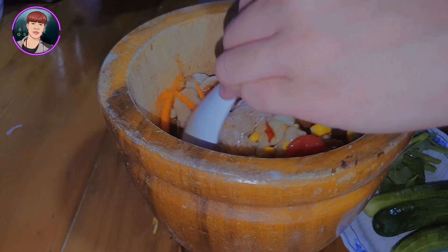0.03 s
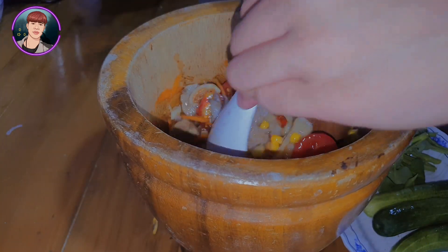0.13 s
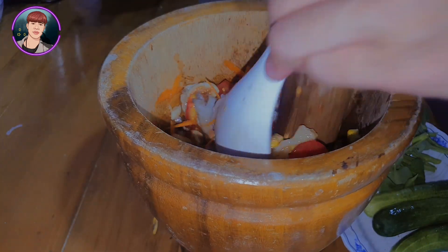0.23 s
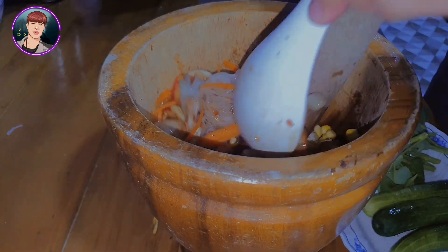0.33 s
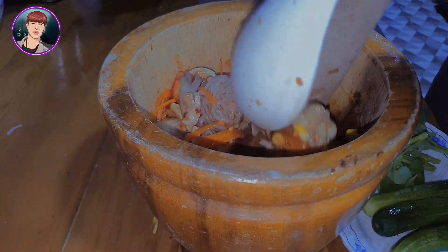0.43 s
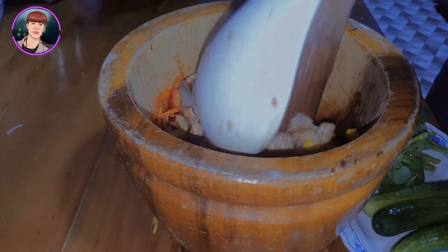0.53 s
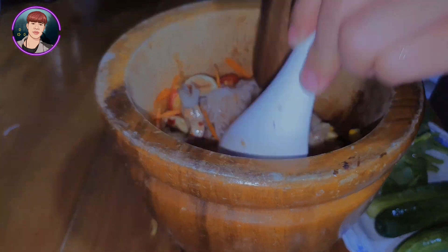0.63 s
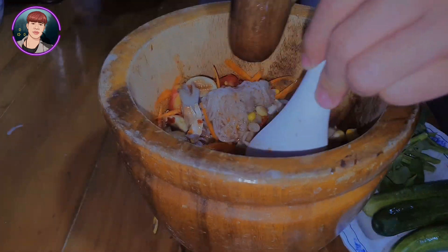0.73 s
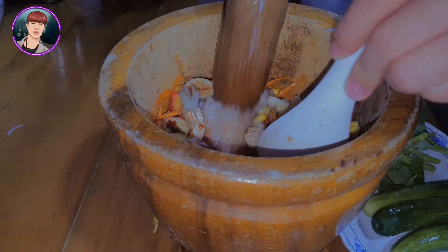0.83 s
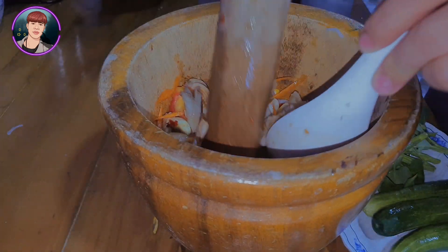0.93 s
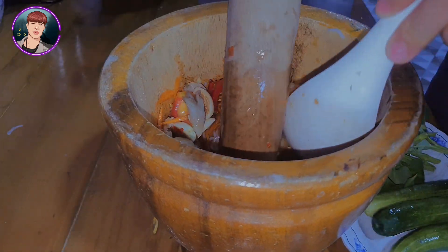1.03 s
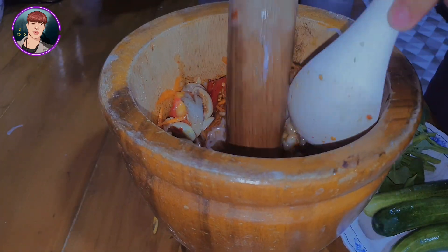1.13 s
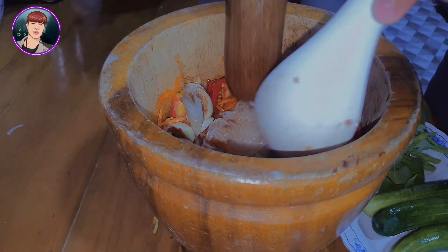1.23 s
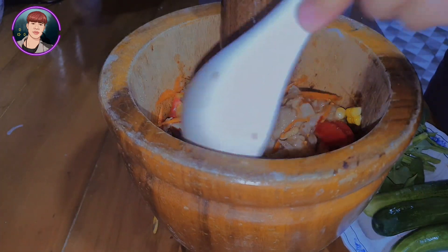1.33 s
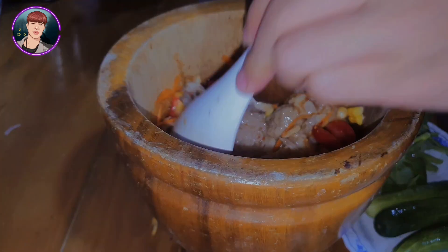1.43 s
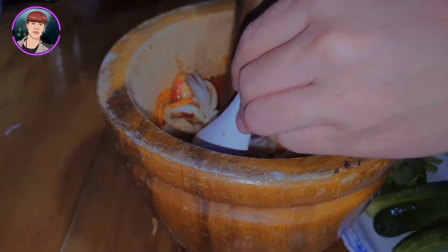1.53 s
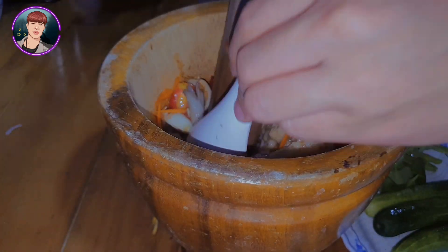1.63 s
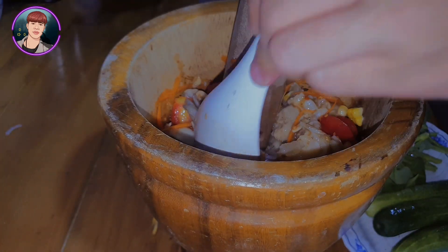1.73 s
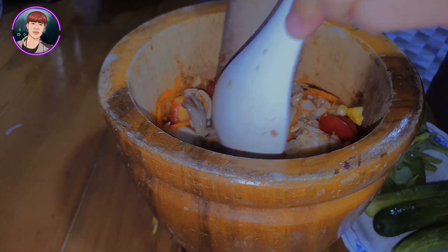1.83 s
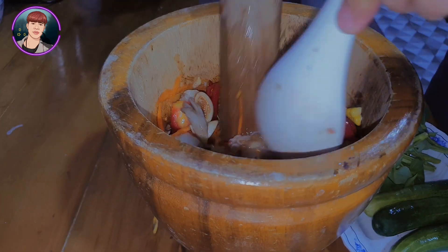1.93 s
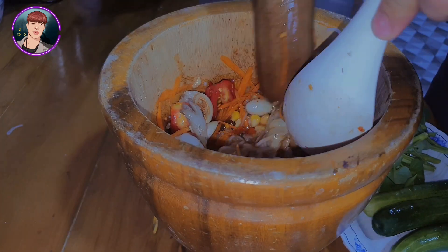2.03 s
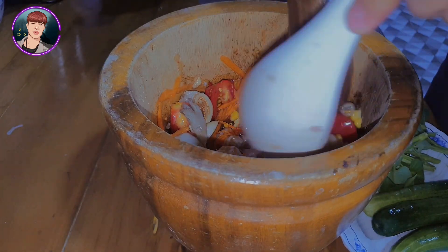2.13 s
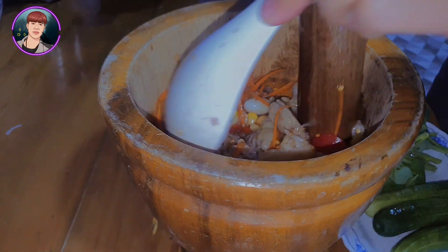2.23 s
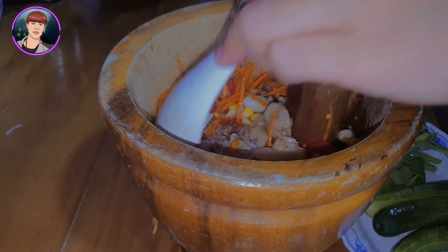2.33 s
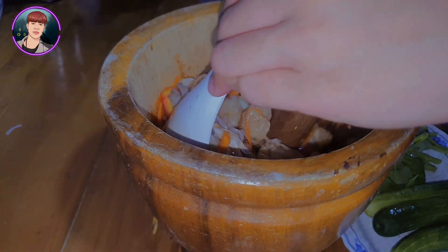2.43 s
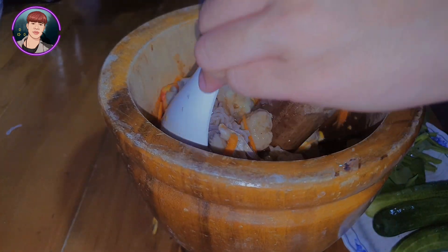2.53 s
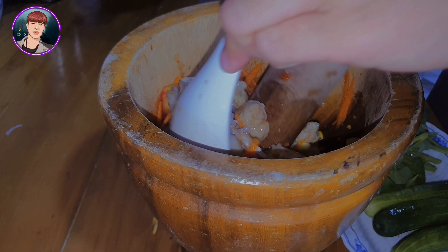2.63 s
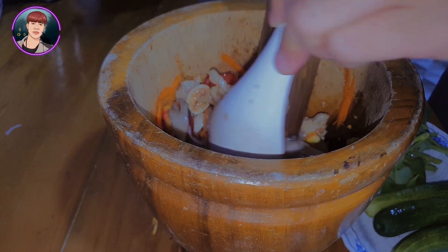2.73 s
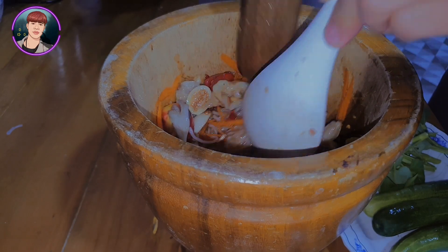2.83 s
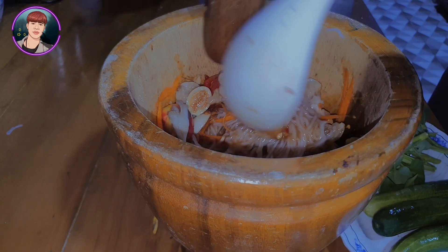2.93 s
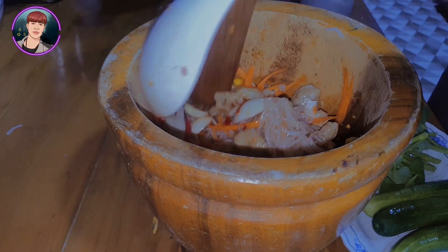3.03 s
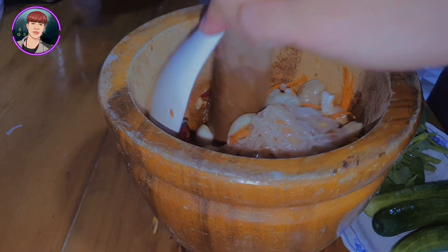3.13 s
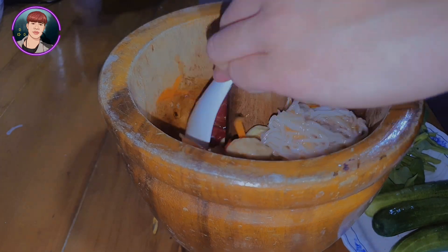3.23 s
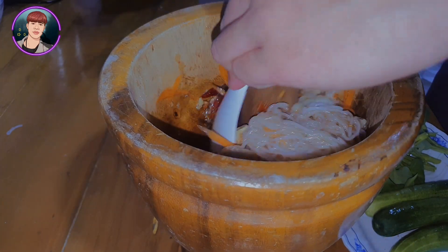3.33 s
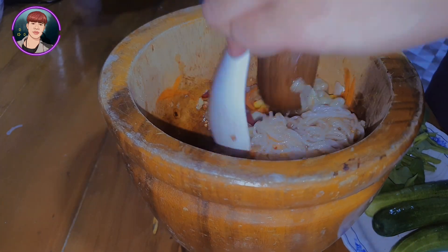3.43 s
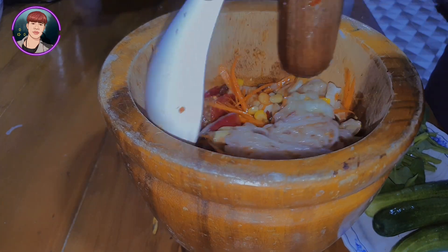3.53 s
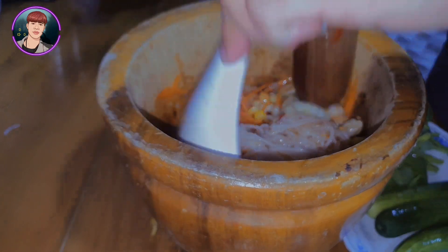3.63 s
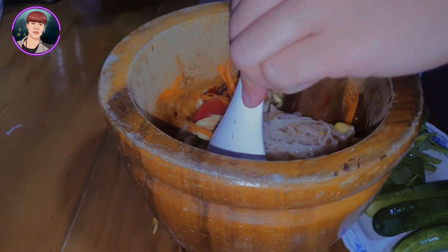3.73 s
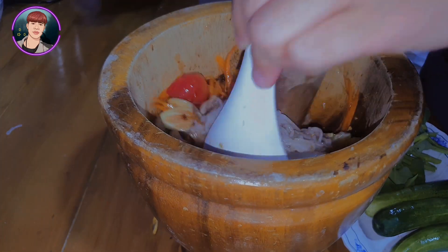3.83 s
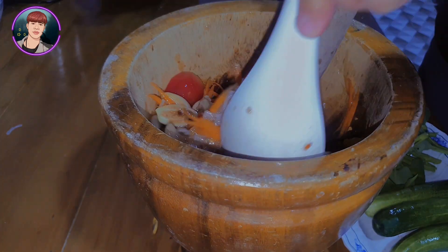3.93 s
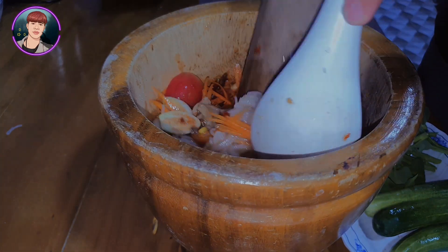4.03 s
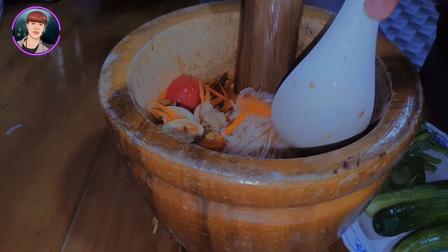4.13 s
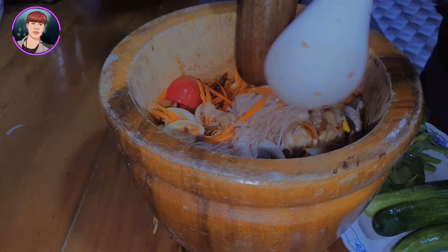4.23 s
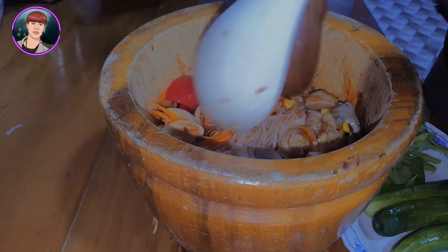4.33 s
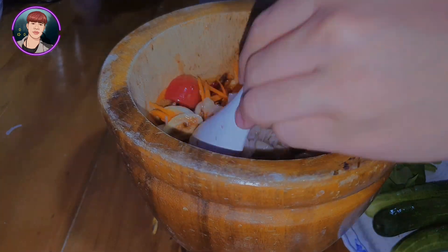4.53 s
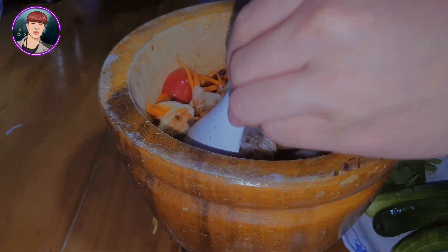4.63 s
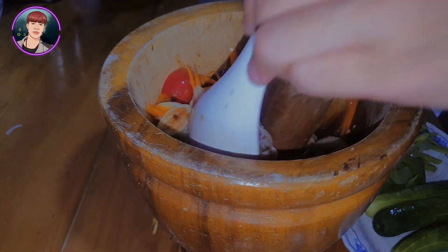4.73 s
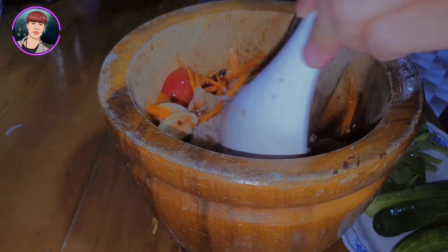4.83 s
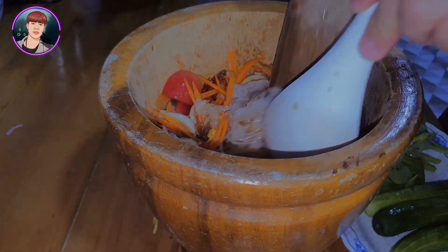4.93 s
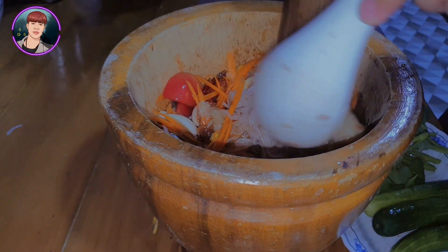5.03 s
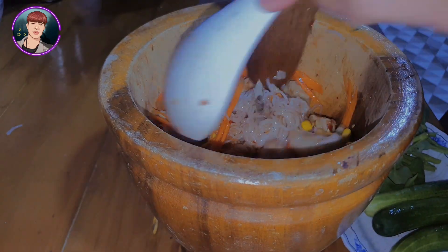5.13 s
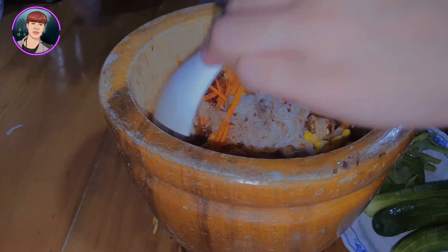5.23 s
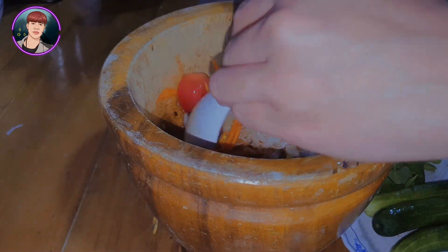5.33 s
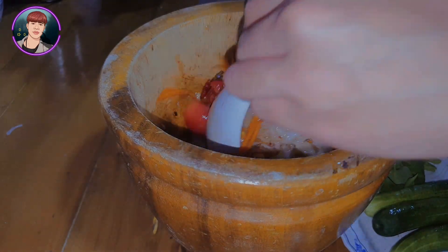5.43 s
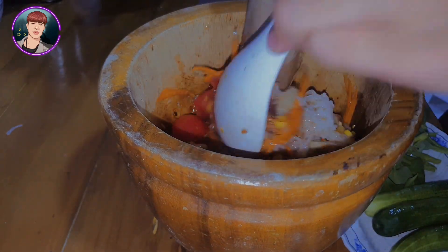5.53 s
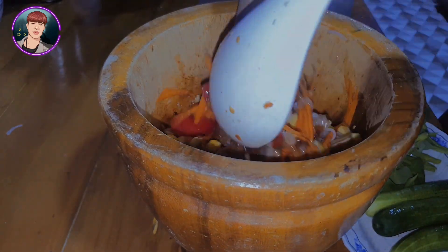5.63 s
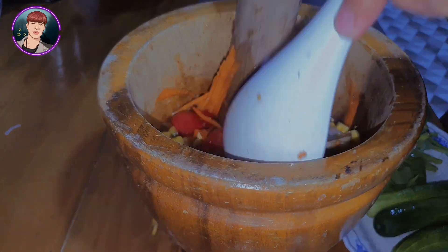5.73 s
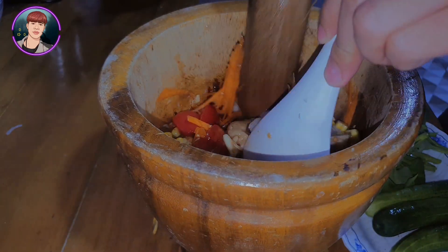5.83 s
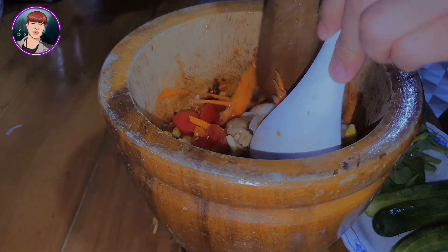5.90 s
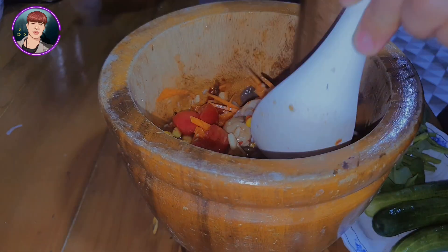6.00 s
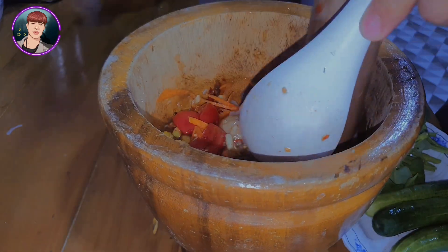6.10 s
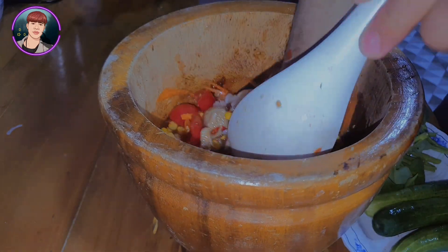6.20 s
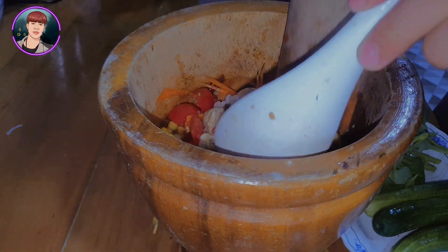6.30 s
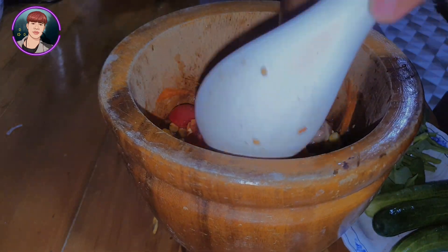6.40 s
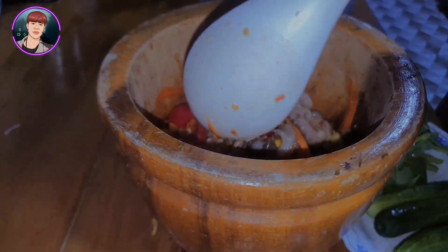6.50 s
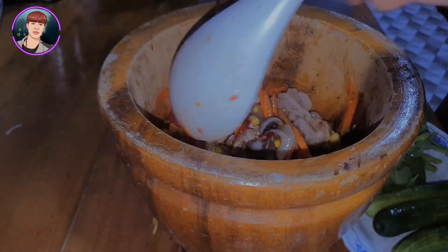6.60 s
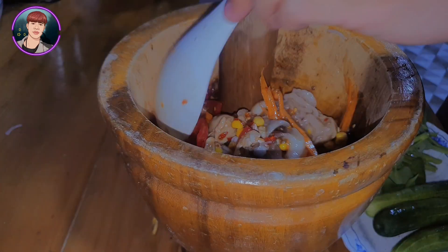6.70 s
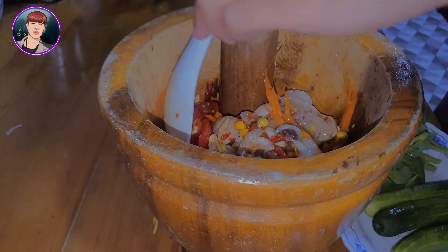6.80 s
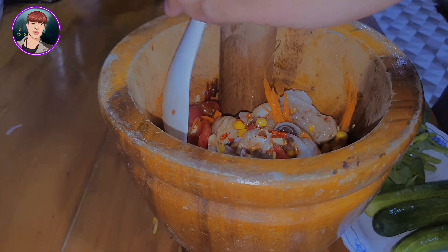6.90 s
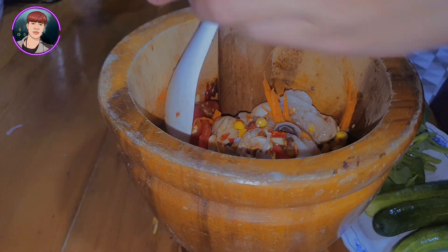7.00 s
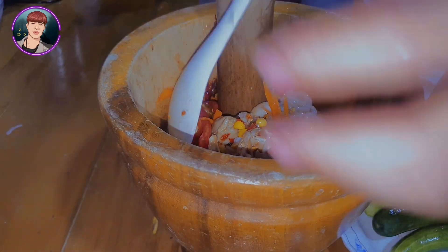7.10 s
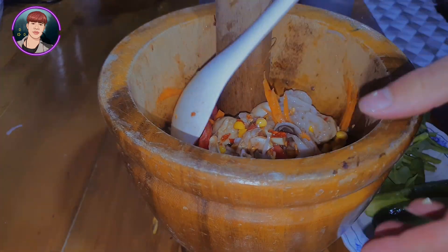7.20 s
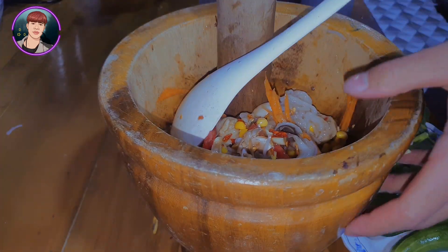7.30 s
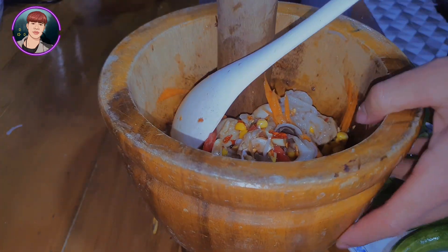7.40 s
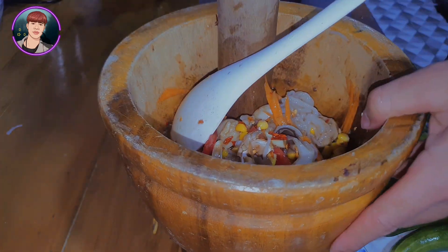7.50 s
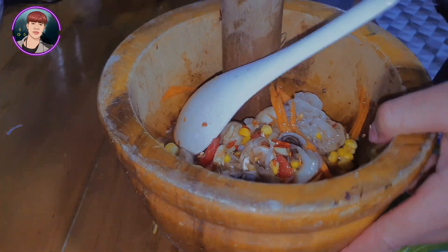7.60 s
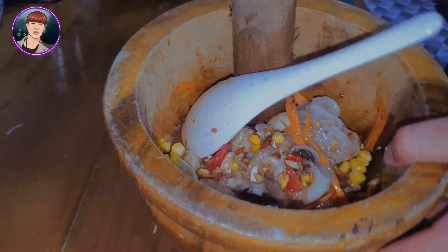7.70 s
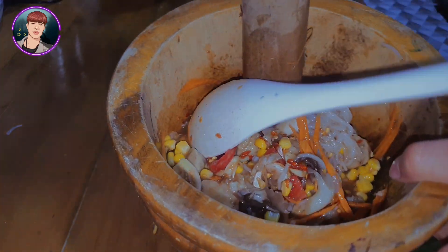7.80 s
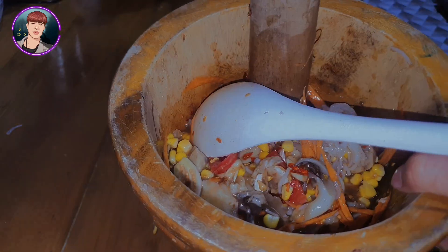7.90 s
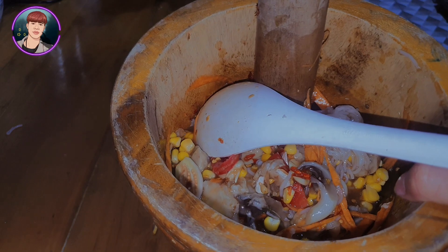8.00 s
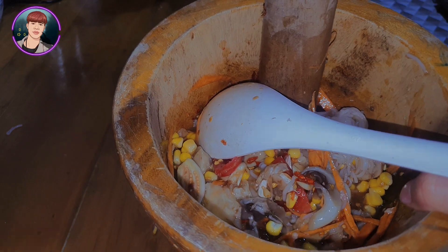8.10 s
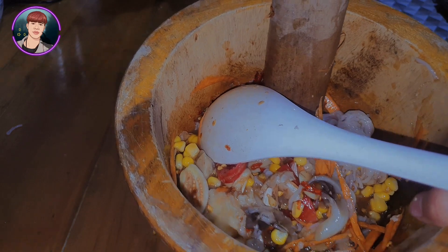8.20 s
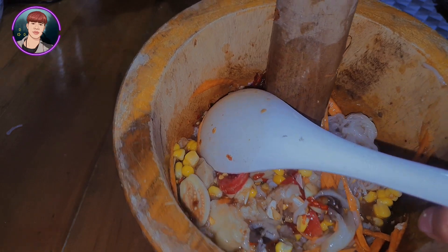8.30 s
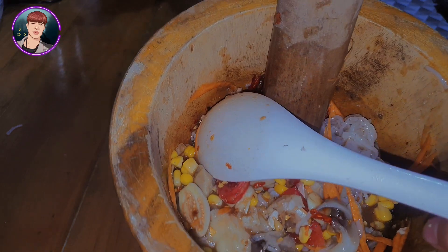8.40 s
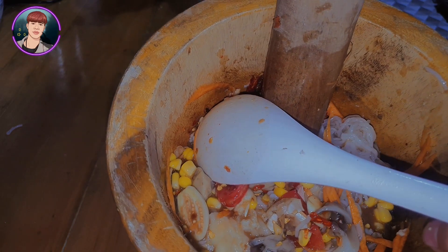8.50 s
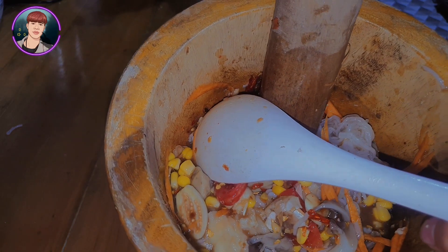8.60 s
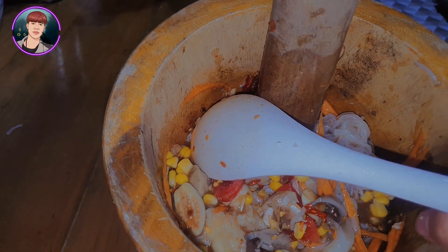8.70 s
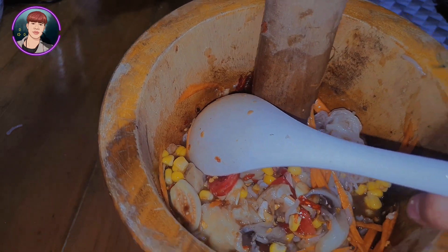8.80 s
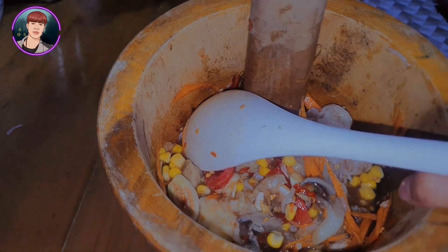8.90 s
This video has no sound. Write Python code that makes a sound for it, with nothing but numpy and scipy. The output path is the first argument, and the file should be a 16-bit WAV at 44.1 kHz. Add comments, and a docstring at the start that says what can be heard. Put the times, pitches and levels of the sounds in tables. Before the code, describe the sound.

A wooden pestle pounds wet salad in a big wooden mortar, with dull hollow thuds about once or twice a second. A hard plastic spoon clacks on the wall and scrapes as it turns the food, which squelches and crackles. The mortar rocks and bumps on the table. After about six and a half seconds the pounding stops, leaving small knocks and quiet. Close stereo microphone, small kitchen, faint refrigerator hum.

```python
"""A wooden pestle pounds wet food in a wooden mortar on a table: dull bursts, wood rings and wet slaps.
A hard plastic spoon clacks on the wall as ringing modes over noisy cracks, and scrapes as slipping noise.
The food squelches, crackles and ticks; the mortar rocks as flaring noise and bumps as swelling low tones.
A refrigerator hums as wavering lines over steady noise. The kitchen answers with decaying noise tails,
and a close stereo microphone colours the sum."""
import sys
import numpy as np
from scipy import signal
from scipy.fft import rfft, irfft, next_fast_len
from scipy.io import wavfile
from scipy.ndimage import uniform_filter1d, map_coordinates

SR = 44100
rng = np.random.default_rng(int(sys.argv[2]) if len(sys.argv) > 2 else 0)


def to_wav(sig):
    """Store sig (one row per channel, or 1-D mono) as 16-bit WAV at the path in sys.argv[1].

    Samples outside -1..1 are clipped; the rate is SR.
    """
    pcm = np.clip(np.atleast_2d(sig), -1, 1) * 32767
    pcm = np.round(pcm).astype(np.int16)
    wavfile.write(sys.argv[1], SR, pcm.T)  # frames by channels


N = 394694  # length in samples


def amp(db):
    """Gain of a level in dB."""
    return 10 ** (np.asarray(db) / 20)


def unit(x):
    """x at rms 1."""
    return x / np.sqrt(np.mean(x ** 2) + 1e-20)


def along(points, hz):
    """Read a (Hz, value) curve on a log frequency axis."""
    f, v = np.transpose(points)
    return np.interp(np.log(hz + 1), np.log(f + 1), v)


def curves(rows):
    """One value per sample for each column after the time."""
    s, *cols = np.transpose(rows)
    return [np.interp(np.arange(N) / SR, s, c) for c in cols]


def wobble(rate):
    """A smooth random curve, rate knots a second."""
    t = np.arange(0, N + 64, 64) / SR
    knots = rng.standard_normal(int(N * rate / SR) + 4)
    return np.interp(np.arange(N) / SR, t, map_coordinates(knots, [t * rate]))


def filtered(x, response):
    """x times a complex response of frequency."""
    m = next_fast_len(N + SR // 2)
    return irfft(rfft(x, m) * response(np.fft.rfftfreq(m, 1 / SR)), m)[..., :N]


def widened(pair, colour, alike):
    """Two noises, coloured and mixed into left and right of the given likeness."""
    turn = lambda hz: np.arccos(np.clip(along(alike, hz), -1, 1)) / 2
    mid, side = filtered(pair, lambda hz: colour(hz) * [np.cos(turn(hz)), np.sin(turn(hz))])
    return np.array([mid + side, mid - side])


def gritty(per_s, life_s, depth):
    """Two noises that flare together in short random slips."""
    slips = (rng.random(N) < per_s / SR) * rng.exponential(size=N)
    flares = signal.lfilter([1], [1, -np.exp(-1 / (life_s * SR))], slips)
    return (1 + depth * flares) * rng.standard_normal((2, N))


def add(out, s, sound, pan_db):
    """Mix a sound in at s seconds: louder on its own side, and earlier there give or take a random lag."""
    lag = round(np.clip(.6 * pan_db + rng.normal(0, 1.5), -8, 8))  # samples
    for side, sign in enumerate((1, -1)):
        start = round(s * SR) - sign * lag // 2
        out[side, start:][:len(sound)] += sound * amp(sign * pan_db / 2)


def ring(modes, tilt, t, damping, scatter_db, detune, contact_s):
    """Modes struck at new strengths; the contact and each mode's first cycle make a smooth rise."""
    hz, db, t60 = np.transpose(modes)[:, :, None]
    draw = rng.standard_normal((2, len(modes), 1))
    fall_db = 60 * t * np.clip(damping, .4, 6) / t60
    level_db = db + along(tilt, hz) + scatter_db * draw[0] - fall_db
    rise = 1 - np.exp(-t / (contact_s + 0.88 / hz))
    swing = np.sin(2 * np.pi * hz * (1 + detune * draw[1]) * t)
    return np.sum(amp(level_db) * swing * rise, axis=0)


# compressor and mains lines: (f/Hz, level/dB)
HUM_LINES = [(48.5, -50.5), (102, -52), (146, -59.5), (196, -68.5), (245, -66), (293, -74), (538, -71.5),
             (1077, -86), (2105, -89)]
# colour of the fan and microphone noise, before its overall level: (f/Hz, level/dB)
AIR_COLOUR = [(18, -52), (30, 11.5), (105, 8), (125, -18), (160, -12), (256, -23.5), (307, -13), (467, -21),
              (532, -20), (591, -33.5), (945, -38.5), (1590, -17.5), (2240, -45.5), (3070, -19.5),
              (4420, -42), (6890, -32), (15500, -52.5)]
# stereo width of that noise: (f/Hz, left-right likeness)
AIR_LIKENESS = [(60, 0.85), (240, 0.38), (950, 0), (3770, 0), (15000, 0.47)]
AIR_TREBLE_DB = -62.5  # level of the noise above 1200 Hz


def refrigerator():
    """Compressor and mains lines waver in level and phase over steady fan noise."""
    t = np.arange(N) / SR
    lines = np.zeros(N)
    for hz, db in HUM_LINES:
        level = np.sqrt(2) * amp(db + 2.2 * wobble(1.6))
        lines += level * np.sin(2 * np.pi * hz * t + 0.54 * wobble(1.7))
    air = widened(rng.standard_normal((2, N)), lambda f: amp(along(AIR_COLOUR, f)), AIR_LIKENESS)
    treble = filtered(air, lambda f: f > 1200)
    return lines + amp(AIR_TREBLE_DB) * air / np.std(treble)


def crackle(per_s, centre_hz, octaves, cycles):
    """Wet grains of random pitch, size and side, in clumps: each a few damped cycles."""
    draw, step = rng.random((int(per_s * N / SR), 5)), np.arange(SR // 100)
    start = (draw[:, :1] * N).astype(int)
    hz = centre_hz * 2 ** (octaves * (draw[:, 1:2] + draw[:, 2:3] - 1))
    turns = hz * step / SR
    size = -np.log(1 - draw[:, 3:4]) * amp(4.45 * wobble(45))[start]  # the wobble makes the clumps
    grains = size * np.sin(2 * np.pi * turns) * np.exp(-turns / cycles) * (1 - np.exp(-turns))
    at = (start + step).ravel()
    sides = draw[:, 4:], 1 - draw[:, 4:]
    return unit(np.array([np.bincount(at, (grains * np.sqrt(side)).ravel(), N)[:N] for side in sides]))


# stirring strokes, the course of the scrape: (t/s, level/dB)
STIR_STROKES = [(0.0, -46), (0.3, -62.5), (0.79, -54), (1.17, -50), (1.34, -52.5), (1.44, -72),
                (1.49, -52.5), (2.22, -51), (3.26, -51), (3.44, -48), (3.66, -88.5), (3.76, -65),
                (4.41, -59), (5.71, -47.5), (5.86, -56), (6.58, -64), (6.78, -41.5), (6.97, -79),
                (7.45, -61), (8.95, -76)]
# squelches of pressed food: (t/s, level/dB, fizz against scrape/dB, fall t60/s)
FOOD_SQUELCHES = [(0.181, -44, -21, 1), (0.291, -28, -20, 0.32), (0.4294, -35, 13, 0.022),
                  (0.704, -25.5, -10, 0.064), (0.877, -43, 3.5, 0.14), (1.0346, -38, 28.5, 0.024),
                  (1.1933, -12.5, -13.5, 0.058), (1.485, -41, 16.5, 0.051), (2.1894, -68, -5, 0.088),
                  (2.234, -36, -10, 0.06), (2.388, -30.5, -0.5, 0.09), (2.416, -14, -26, 0.044),
                  (3.107, -28, -6.5, 0.18), (3.143, -44, -1.5, 0.18), (3.246, -37, 3, 0.079),
                  (3.603, -36, 1, 0.15), (3.65, -37.5, -10, 0.3), (3.7, -34.5, 1.5, 0.12),
                  (3.726, -34, -26, 0.17), (4.07, -45, -21, 0.48), (4.193, -48, -4.5, 0.29),
                  (4.508, -35.5, -12, 0.52), (5.12, -40, -32.5, 0.37), (5.285, -27, 1, 0.11),
                  (5.314, -19, -13, 0.081), (5.514, -18.5, -23.5, 0.16), (5.5754, -21, -20.5, 0.068),
                  (6.212, -34.5, -19, 0.15), (6.662, -21, -12, 0.064), (6.68, -27, -3, 0.033),
                  (6.75, -70, -18, 0.11)]
# colour of the scrape: (f/Hz, level/dB)
SCRAPE_COLOUR = [(590, -16), (1000, 2), (1800, 3.5), (2080, 2), (4060, -1.5), (6000, -11.5), (7800, -47.5),
                 (13200, -120)]
# colour of the juice's fizz: (f/Hz, level/dB)
FIZZ_COLOUR = [(2060, -48), (3500, -19), (5870, -3), (6860, -1.5), (7430, -6), (10200, -3.5),
               (15500, -18.5)]
# stereo width of the near noises, scrape, fizz and rocking: (f/Hz, left-right likeness)
NEAR_LIKENESS = [(60, 1), (180, 0.95), (550, 0.5), (1650, 0.13), (4970, 0.014), (15000, 0.033)]
# fizz at the reference scrape; dB of fizz for each dB of scrape
JUICE_DB, JUICE_GROWS, STIR_REF_DB = -66.5, 0.95, -55.5


def stirring():
    """The spoon edge slips on the wall and pressed food squelches: a dull scrape, crackle and fizz of juice."""
    scrape_db, = curves(STIR_STROKES)
    juice_db = JUICE_DB + JUICE_GROWS * (scrape_db - STIR_REF_DB)
    jerk = amp(2.5 * wobble(14))  # small jerks of the hand
    drift_db = 4.5 * wobble(18)  # the scrape turns duller or brighter
    scrape, fizz = amp(scrape_db) * jerk, amp(juice_db) * jerk
    t = np.arange(SR // 2) / SR
    for s, db, fizz_db, t60 in FOOD_SQUELCHES:
        swell = amp(db - 60 * t / t60) * (1 - np.exp(-t / 0.01)) ** 2
        scrape[round(s * SR):][:len(t)] += swell
        fizz[round(s * SR):][:len(t)] += swell * amp(fizz_db)
    dull = unit(widened(gritty(85, 0.008, 0.95), lambda f: amp(along(SCRAPE_COLOUR, f)), NEAR_LIKENESS))
    low = filtered(dull, lambda f: 1 / (1 + (f / 2300) ** 4))
    dull = low * amp(-drift_db) + (dull - low) * amp(drift_db)
    bright = unit(widened(gritty(110, 0.0022, 1.0), lambda f: amp(along(FIZZ_COLOUR, f)), NEAR_LIKENESS))
    lumps = crackle(600, 2400, octaves=1.2, cycles=3)
    spits = crackle(600, 5200, octaves=.9, cycles=2.5)
    return scrape * (0.55 * dull + 0.4 * lumps) + fizz * (1.4 * bright + .9 * spits)


# envelope settings for the sound that follows each knock
SHAKE_DB, SHAKE_T60_S, SHAKE_RISE_S = -19, 0.31, 0.14  # the table keeps rocking; both share the rise
SETTLE_DB, SETTLE_T60_S = -38.5, 0.71  # the pestle grinds on in the bowl


def aftermath(level_db, t60_s):
    """An envelope that swells after every knock, in proportion to the knock, and dies away."""
    out, t = np.zeros(N + SR), np.arange(SR) / SR
    for s, db, *_ in MORTAR_KNOCKS:
        swell = amp(db + level_db - 60 * t / t60_s) * (1 - np.exp(-t / SHAKE_RISE_S))
        out[round(s * SR):][:len(t)] += swell
    return out[:N]


# hands lean on the mortar, the course of the rocking: (t/s, level/dB)
HAND_PUSHES = [(0.0, -36.5), (0.45, -45.5), (2.07, -53.5), (2.49, -31), (2.94, -47.5), (3.16, -19.5),
               (3.46, -75), (3.72, -28), (3.89, -31.5), (4.04, -46.5), (4.51, -55), (4.69, -32),
               (5.01, -57), (5.3, -35.5), (5.42, -35.5), (5.62, -40.5), (5.9, -53), (6.63, -58.5),
               (8.95, -53)]
# resonances of table and mortar, also struck by knocks and bumps: (f/Hz, level/dB, t60/s)
WOOD_MODES = [(69.1, 0.5, 0.39), (86.8, 12.5, 0.15), (114.5, 7, 0.091), (158.3, -1, 0.31),
              (228.6, -6.5, 0.21), (298, -5, 0.18), (333.5, -0.5, 0.14), (410.2, 1.5, 0.11),
              (496, -2, 0.059), (523.3, -10, 0.3), (564, 7, 0.053), (659.3, -3, 0.13), (713, -3, 0.075),
              (805, -9, 0.063), (1081, -7.5, 0.045), (1284, -23, 0.026), (1914, -20, 0.041)]
RUB_DB = -12  # rubbing of the bowl under the rocking


def rocking():
    """Uneven pushes shake the table under the mortar and rub the bowl: flaring noise through the wood's modes."""
    push_db, = curves(HAND_PUSHES)

    def wood(f):
        total = 0
        for centre, db, t60 in WOOD_MODES:
            loss = 1j * f * (0.5 / t60 + 14)  # bandwidth in Hz
            total = total + amp(db) * loss / (centre * centre - f * f + loss)
        return total

    table = lambda f: wood(f) / (1 + (f / 260) ** 6)
    bowl = lambda f: wood(f) / (1 + (280 / (f + 1)) ** 6)
    rock_level = amp(push_db) + aftermath(SHAKE_DB, SHAKE_T60_S)
    rock = rock_level * unit(widened(gritty(97, 0.037, 3.7), table, NEAR_LIKENESS))
    rub_level = amp(push_db + RUB_DB) + aftermath(SETTLE_DB, SETTLE_T60_S)
    return rock + rub_level * unit(widened(gritty(22, 0.009, 0.54), bowl, NEAR_LIKENESS))


# spoon clacks: (t/s, level/dB, low ring/dB, middle ring/dB, high ring/dB, left-right/dB,
# damping by hand and food [factor, held to 0.4-6])
SPOON_CLACKS = [(0.0458, -26.5, -24, -16, 3, 4.5, 0.87), (0.361, -23.5, 9, 9, -3.5, -1, 3),
                (0.661, -32, 4, -1.9, 8.5, 1, 2.2), (1.0026, -16, 12, 5, 2.5, 3, 1.5),
                (1.165, -26.5, -21, 0.7, -13, -4, 1.7), (1.1979, -36.5, 12.5, -6, -7, 3, 1.7),
                (1.208, -27, 7.5, 6, 1.5, 7, 1.8), (1.473, -53, -24, -8, 18, 1, 1.5),
                (1.7458, -34, -32, -29, 0, 3, 0.52), (2.743, -34, -12.5, -2.5, -25, 8, 1.6),
                (2.86, -34.5, 15, 6, -20, 3, 10), (3.1489, -30, 7, 12.5, -10, 4.5, 1.1),
                (4.622, -22.5, -16, 0.5, 5, 2.8, 1.65), (4.632, -25.5, -6.5, -9, -1, -3.2, 1.65),
                (5.2492, -20, 2, 7, 11, -6.5, 7), (5.7382, -8, -6, -4.5, 1.7, -3.5, 0.95),
                (5.7483, -6.5, -11, -0.3, 0.5, 4.5, 2), (6.5892, -41.5, 6, -4, 11.5, 0, 3),
                (6.7384, -31, 9.5, -12, 19, 3.5, 1.6), (7.3083, -27.5, 9, 1, -14.5, 2.5, 4.8),
                (7.316, -39, -17, -5, 3, -29, 4.5)]
# resonances of the plastic spoon: (f/Hz, level/dB, t60/s at damping 1)
SPOON_MODES = [(581, 7, 0.051), (768, 8.5, 0.039), (1063, -10, 0.16), (1140, 6, 0.013), (1410, -11, 0.062),
               (1613, 1, 0.02), (1966, -7, 0.022), (2284, 4.5, 0.012), (2460, -15.5, 0.095),
               (3880, 5, 0.01), (4620, 10, 0.011), (5210, 8.5, 0.009), (5950, 7, 0.011), (6900, 8, 0.009),
               (8170, 8, 0.006)]
CRACK_DB, CRACK_T60_S = -7.5, 0.044  # noisy crack against the high ring setting
WALL_HZ, WALL_DB, WALL_T60_S = [1090, 2640], 1, 0.0077  # dry smack of the wall, against the middle ring
CHATTER, CHATTER_T60_S = 2.8, 0.12  # rattle of the loose contact


def spoon():
    """Each clack rings the spoon's modes briefly over a noisy crack and the wooden wall's dry smack."""
    out, t = np.zeros((2, N + SR)), np.arange(SR // 8) / SR
    dull, wall = signal.butter(3, 6500, fs=SR), signal.butter(2, WALL_HZ, 'band', fs=SR)
    for s, db, low_db, middle_db, high_db, pan_db, damping in SPOON_CLACKS:
        tilt = [(800, low_db - 23.5), (1000, low_db), (1250, low_db), (1350, middle_db), (1950, middle_db),
                (2150, 0.011), (3000, 0.0038), (4000, high_db - 12.5)]
        crack_level = amp(high_db + CRACK_DB - 60 * t / CRACK_T60_S)
        crack = signal.lfilter(*dull, crack_level * rng.standard_normal(len(t)))
        plastic = ring(SPOON_MODES, tilt, t, damping, scatter_db=2.5, detune=.012, contact_s=.0001)
        smack_level = amp(WALL_DB + middle_db - 60 * t / WALL_T60_S)
        smack = signal.lfilter(*wall, smack_level * rng.standard_normal(len(t)))
        rattle = uniform_filter1d(rng.standard_normal(len(t)), size=24)
        chatter = 1 + CHATTER * amp(-60 * t / CHATTER_T60_S) * rattle
        add(out, s, amp(db) * (plastic * chatter + crack + smack), pan_db)
    return out[:, :N]


# pestle and mortar knocks: (t/s, level/dB, table thump/dB, upper ring/dB, burst's starting f/Hz,
# damping by the food [factor, held to 0.4-6])
MORTAR_KNOCKS = [(0.222, -31.5, -18, -11, 545, 1.3), (0.3445, -1, -0.5, 0, 816, 1.71),
                 (0.492, -26.5, 5, -7, 657, 1.4), (0.533, -19, -3.5, 12.5, 487, 2.6),
                 (0.614, -28.5, -28, 25.5, 920, 4.6), (0.663, -28, -32, -32, 569, 1.4),
                 (0.712, -21.5, -23, 12, 685, 4), (1.145, -28.5, 10, -9, 550, 1.5),
                 (1.179, -26.5, 7, -12, 506, 1.5), (1.551, -23.5, 0.5, -18, 466, 2.14),
                 (1.91, -33.5, 14, -11, 543, 1.2), (1.985, -30, -27, -8, 750, 1.8),
                 (2.052, -29, -4, -32, 610, 1.9), (2.397, -22.5, 9.5, -39, 570, 1.53),
                 (2.415, -21.5, -4, -1, 580, 0.33), (2.459, -20, -21, 4.5, 672, 0.54),
                 (2.566, -4, -4, 1.5, 660, 1.88), (2.76, -19.5, -29, 13, 636, 3.7),
                 (2.951, -24.5, 5, -26, 400, 1.5), (2.977, -15.5, -10, 0, 569, 0.44),
                 (3.135, -12, -0.5, 3, 540, 0.76), (3.175, -3, -0.5, -19, 480, 2.55),
                 (3.202, -16.5, -6, -11, 470, 0.64), (3.43, -37.5, -20, 29.5, 955, 7.1),
                 (3.464, -30, -21, 16, 695, 5), (3.611, -24.5, -3.5, 4, 614, 1.1),
                 (3.648, -24, -17, -2, 580, 1.8), (3.833, -5, -3.5, 6.5, 625, 1.4),
                 (4.47, -37.5, 7.5, -11, 710, 0.45), (4.622, -8, -4.5, -1, 590, 1.47),
                 (4.791, -24, 11, -4, 804, 2.56), (4.94, -33, -30, -8, 780, 2.7),
                 (4.953, -23.5, -33, 10, 696, 2.4), (5.008, -48, -33, 31, 1040, 1.8),
                 (5.093, -21, -9.5, 3.5, 534, 0.8), (5.176, -14, -7.5, 2.5, 565, 1.4),
                 (5.25, -13, -25, 11, 744, 3.4), (5.598, 0.4, -3, 5, 750, 2.04),
                 (5.636, -17.5, -33, -23, 794, 0.67), (5.74, -14, -36, -14, 548, 0.92),
                 (6.1, -3, -4.5, 7.5, 554, 2.04), (6.593, -21, 5, 3, 500, 1.25),
                 (7.305, -18.5, -29, 12.5, 760, 6.7), (7.463, -34, -21, -24, 560, 1.9),
                 (7.714, -16, 6.5, 8, 515, 1.96)]
BURST_T60_S, BOWL_RING_DB = 0.041, -4.5  # burst decay at damping 1; tilt of the bowl modes
SAG_PER_S = 12  # the burst's pitch sinks as the tip digs into the food
SLOSH = 4.37  # shifting food roughens the ring of the wood
SIDEWAYS_DB = -8.5  # the part of the bowl's ring that reaches the two ports in opposition


def pestle():
    """Each knock is a short dull burst from the bowl, then the ring of mortar and table; the wet food slaps."""
    out, t = np.zeros((2, N + SR)), np.arange(SR // 3) / SR
    wet, soft = signal.butter(2, 2200, fs=SR), signal.butter(2, 4500, fs=SR)  # wet food, blunt wooden tip
    for s, db, table_db, upper_db, burst_hz, damping in MORTAR_KNOCKS:
        tilt = [(250, table_db), (300, BOWL_RING_DB), (800, BOWL_RING_DB), (850, upper_db)]
        turns = burst_hz * (1 - np.exp(-SAG_PER_S * t)) / SAG_PER_S
        burst = amp(-60 * t * np.clip(damping, .4, 6) / BURST_T60_S) * np.sin(2 * np.pi * turns)
        burst *= 1 - np.exp(-t / 0.0018)
        burst *= 1 + 1.39 * amp(-60 * t / 0.03)  # the first swings carry the blow itself
        slap = signal.lfilter(*wet, amp(-16.5 - 60 * t / 0.047) * rng.standard_normal(len(t)))
        wood = ring(WOOD_MODES, tilt, t, damping, scatter_db=2, detune=.012, contact_s=.001)
        rough = uniform_filter1d(rng.standard_normal(len(t)), size=120)
        wood *= 1 + SLOSH * uniform_filter1d(rough, size=60)
        knock = signal.lfilter(*soft, 0.8 * burst + 0.5 * wood + slap)
        add(out, s, amp(db) * knock, 1.3 + rng.normal(0, 1.1))
        across_tilt = [(150, -30)] + tilt[2:]
        across = ring(WOOD_MODES, across_tilt, t, damping, scatter_db=4, detune=.04, contact_s=.001)
        opposed = rng.choice([-1, 1]) * np.outer([1, -1], across)
        out[:, round(s * SR):][:, :len(t)] += amp(db + SIDEWAYS_DB) * opposed
    return out[:, :N]


# the mortar's foot bumps the table: (t/s, level/dB, f/Hz)
FOOT_BUMPS = [(0.237, -8.5, 98.6), (0.764, -12, 112), (1.019, -9.5, 86), (1.345, -18, 93), (1.711, -15, 86),
              (1.939, -12, 83), (2.18, -15, 85), (3.188, 3.5, 167.3), (5.32, -14.5, 81), (5.545, -11, 117),
              (5.922, -13.5, 119), (6.677, -9.5, 125), (6.744, -12, 96), (7.465, -18, 79),
              (8.848, -24, 148)]
BUMP_T60_S = 0.071


def bumps():
    """A soft contact: a few low cycles that swell and die, with a weak ring of the wood."""
    out, t = np.zeros((2, N + SR)), np.arange(SR // 4) / SR
    tilt = [(250, 2.5), (500, -2.0), (1200, -13.5)]
    for s, db, hz in FOOT_BUMPS:
        push = amp(-60 * t / BUMP_T60_S) * np.sin(2 * np.pi * hz * t) * (1 - np.exp(-t / 0.0086))
        wood = ring(WOOD_MODES, tilt, t, 1.42, scatter_db=4.5, detune=0.0054, contact_s=0.012)
        add(out, s, amp(db) * (push + 0.11 * wood), .8)
    return out[:, :N]


# wet ticks of the food: (t/s, level/dB, starting f/Hz)
FOOD_TICKS = [(0.275, -32, 3420), (0.319, -28, 2300), (0.797, -31, 4150), (0.854, -30, 4240),
              (1.277, -29.5, 5700), (1.31, -26.5, 5930), (1.543, -31.5, 2870), (1.621, -34.5, 2820),
              (1.958, -32, 2510), (2.037, -28.5, 1720), (2.137, -33, 2920), (5.124, -27, 2400),
              (5.6, -29.5, 7700), (5.725, -37.5, 5600), (6.1864, -27.5, 3460), (6.682, -22, 5000),
              (6.688, -28.5, 3400), (7.259, -32.5, 8720), (7.675, -37.5, 6700)]


def ticks():
    """Small bubbles and shreds snap: a few noisy cycles each, the pitch rising."""
    out, t = np.zeros((2, N + SR)), np.arange(SR // 20) / SR
    for s, db, hz in FOOD_TICKS:
        snap = np.sin(2 * np.pi * hz * t * (1 + 8 * t)) + .35 * rng.standard_normal(len(t))
        level = amp(db - 60 * t / 0.01) * (1 - np.exp(-t / 0.0011))
        add(out, s, level * snap, rng.normal(0, 1.5))
    return out[:, :N]


# decay of the small kitchen: (f/Hz, t60/s)
KITCHEN_DECAY = [(100, 0.38), (500, 0.54), (2000, 0.46), (8000, 0.44)]


def kitchen(x):
    """Each frequency of the room's answer dies at its own speed; every stretch of sound meets a new tail."""
    out, step = np.zeros((2, N + 2 * SR)), SR // 2
    for start in range(0, N, step):
        hz, t, z = signal.stft(rng.standard_normal((2, SR // 2)), SR, nperseg=256)
        z = z * amp(-60 * t / along(KITCHEN_DECAY, hz)[:, None])
        z[1] *= (hz / (hz + 450))[:, None]  # long waves reach both ports alike
        mid, side = signal.istft(z, SR, nperseg=256)[1]
        tail = np.array([mid + side, mid - side]) / np.linalg.norm(mid)
        mono = x[:, start:start + step].mean(axis=0)
        echo = signal.fftconvolve(mono[None], tail, axes=1)
        out[:, start + 200:][:, :echo.shape[1]] += echo  # the room answers 200 samples late
    return out[:, :N]


def scene():
    """Hits and the food with their room, the rocking and the hum."""
    thuds, clacks, food = pestle() + bumps(), spoon(), stirring() + ticks()
    room = amp(-5.5) * kitchen(thuds + 0.68 * clacks + .5 * food)
    return thuds + clacks + food + room + rocking() + refrigerator()


TOP_HZ = 15800  # band limit of the microphone


def record(dry):
    """The microphone loses the deepest bass and some top, rounds the highest peaks and has a band limit."""
    colour = lambda hz: (1j * hz / (45 + 1j * hz)) ** 4 / (1 + 1j * hz / 12000) ** 2
    x = filtered(dry, colour)
    x = x / (1 + np.abs(x / .98) ** 6) ** (1 / 6)
    return filtered(x, lambda hz: hz < TOP_HZ)


dry = scene()
out = record(dry)
to_wav(out)
```